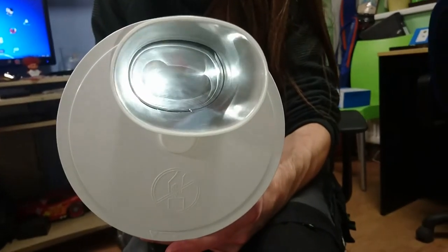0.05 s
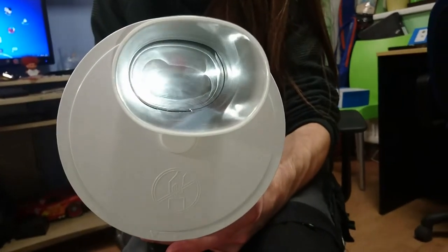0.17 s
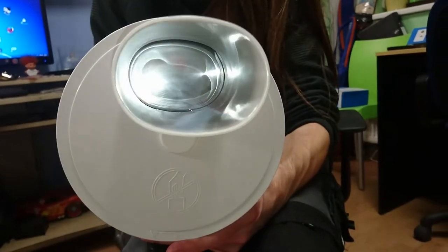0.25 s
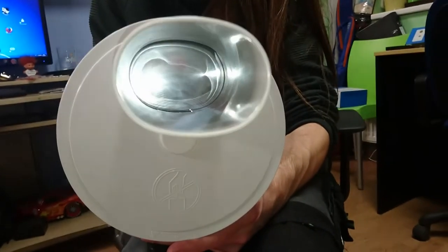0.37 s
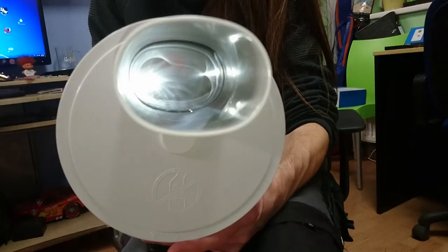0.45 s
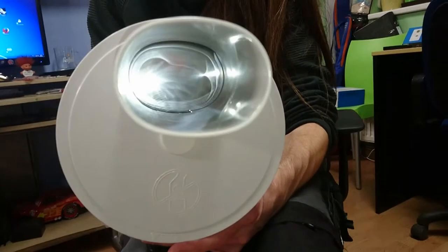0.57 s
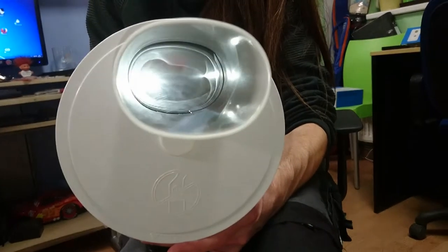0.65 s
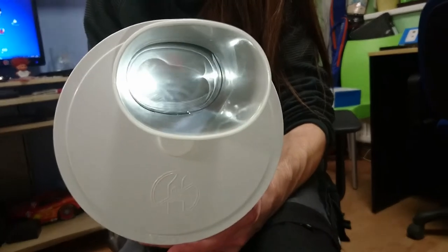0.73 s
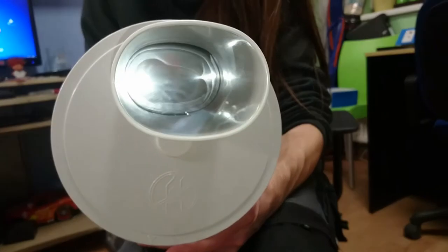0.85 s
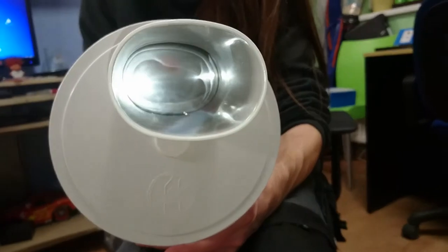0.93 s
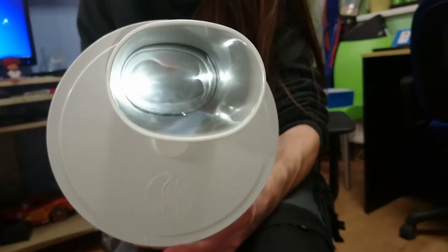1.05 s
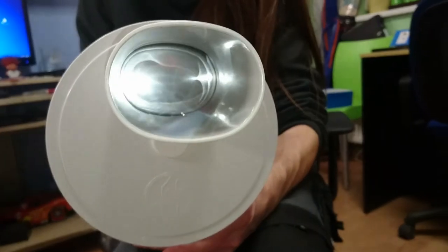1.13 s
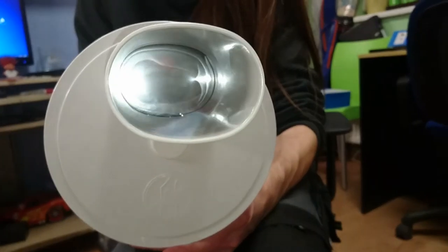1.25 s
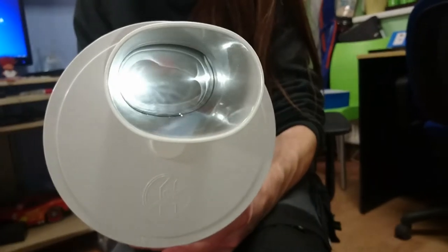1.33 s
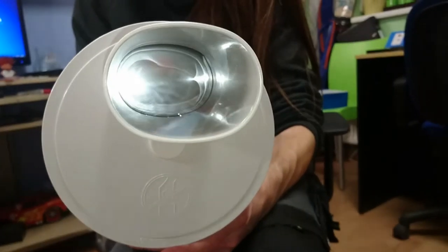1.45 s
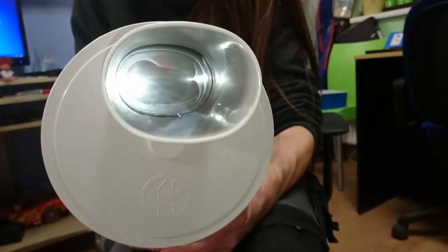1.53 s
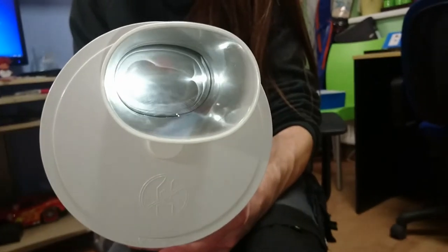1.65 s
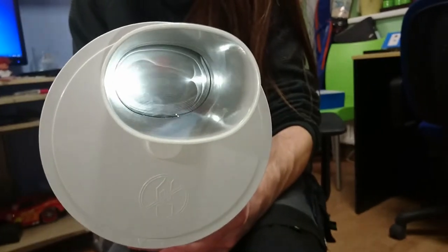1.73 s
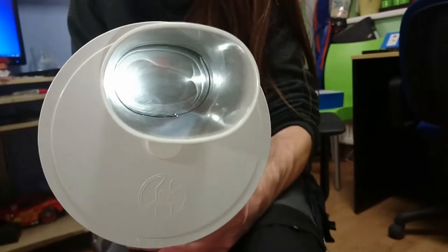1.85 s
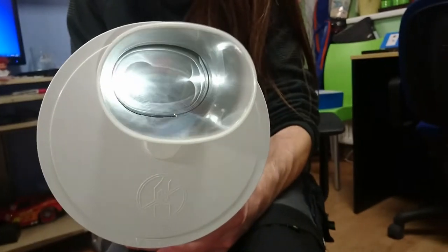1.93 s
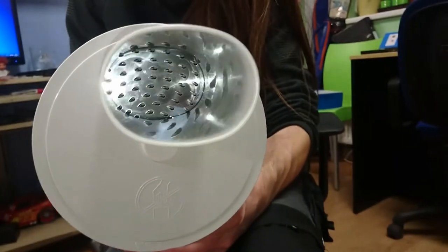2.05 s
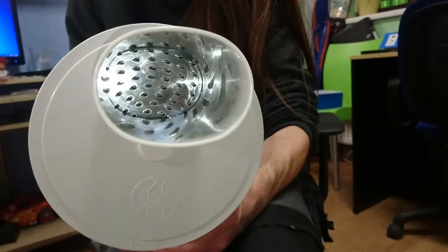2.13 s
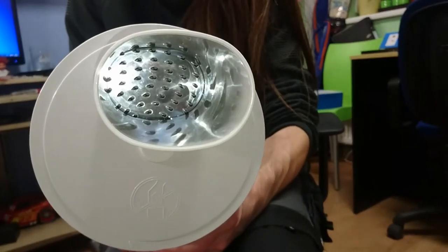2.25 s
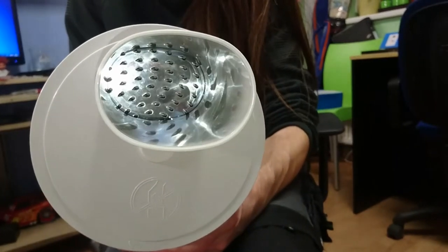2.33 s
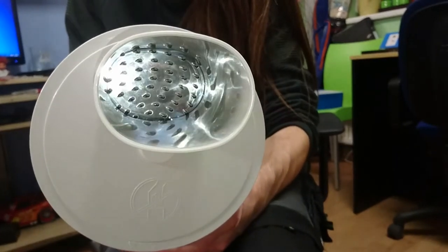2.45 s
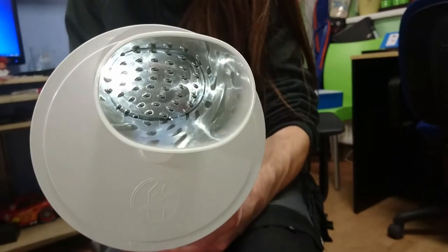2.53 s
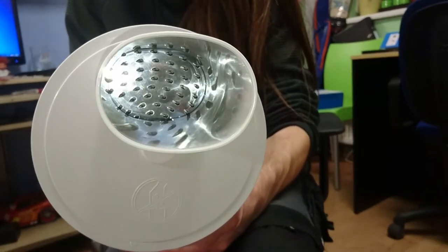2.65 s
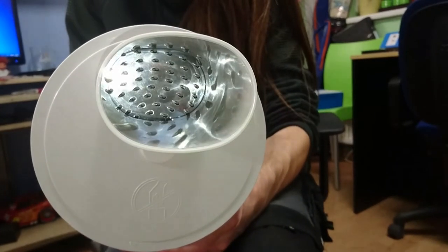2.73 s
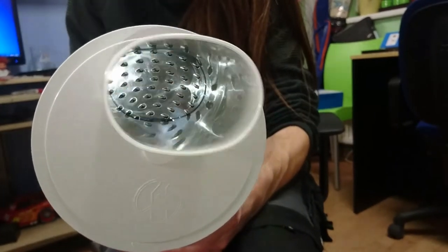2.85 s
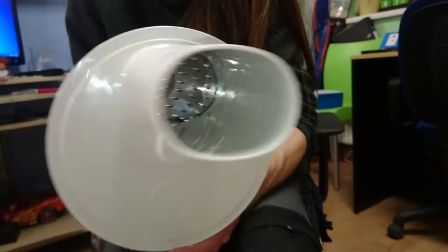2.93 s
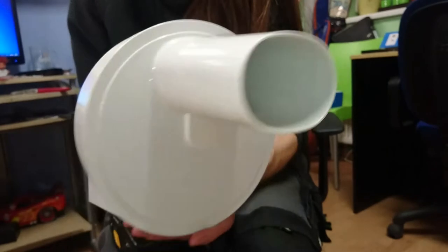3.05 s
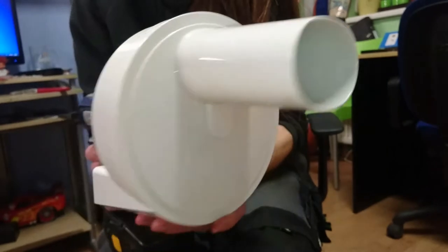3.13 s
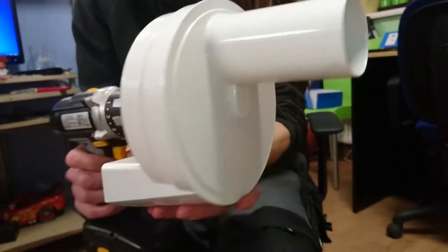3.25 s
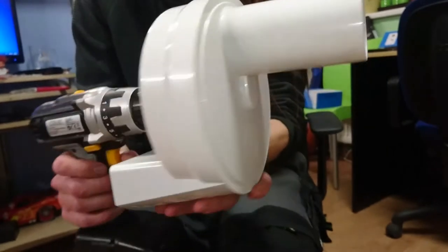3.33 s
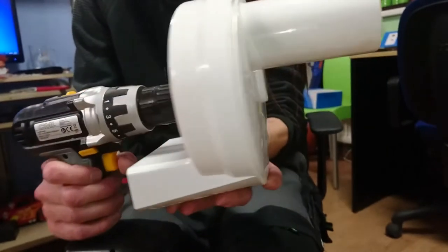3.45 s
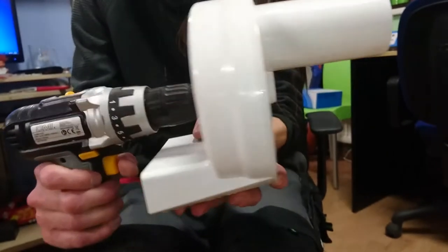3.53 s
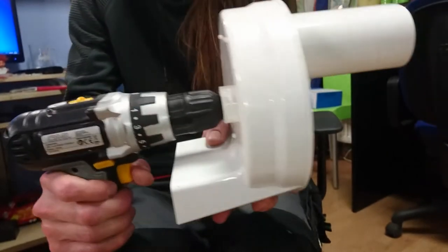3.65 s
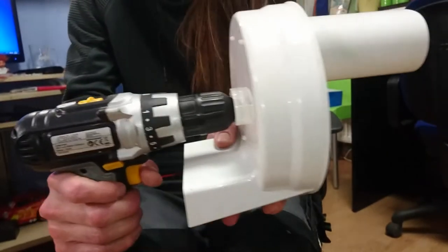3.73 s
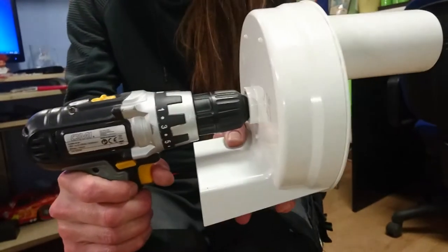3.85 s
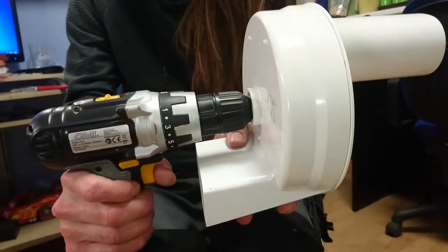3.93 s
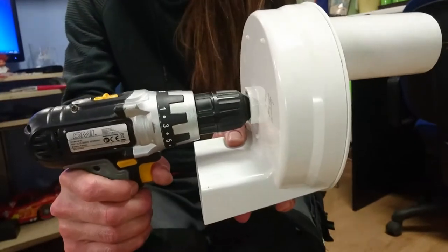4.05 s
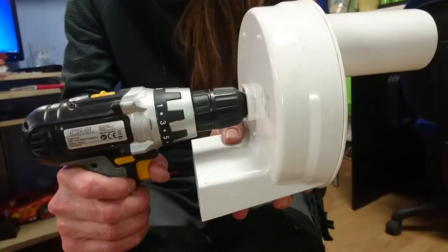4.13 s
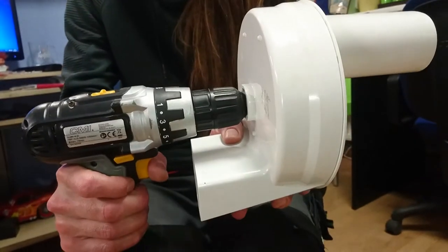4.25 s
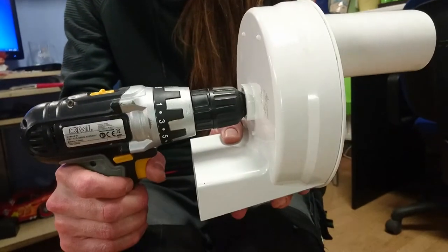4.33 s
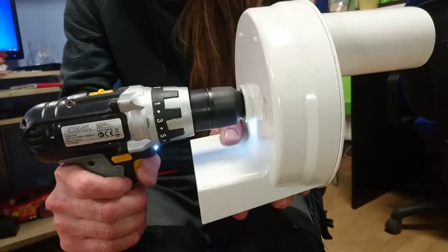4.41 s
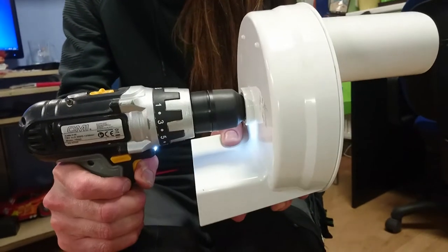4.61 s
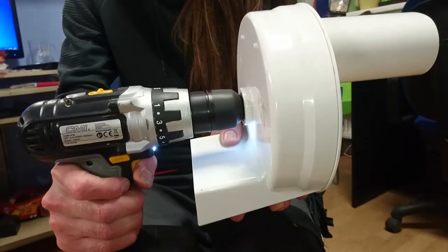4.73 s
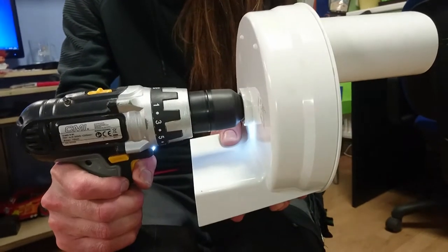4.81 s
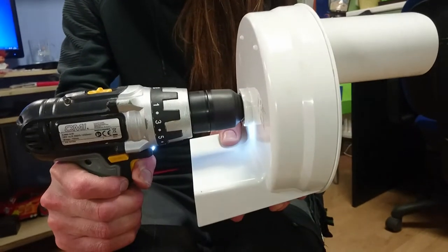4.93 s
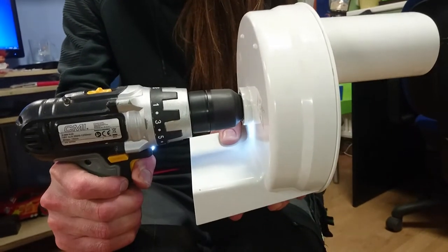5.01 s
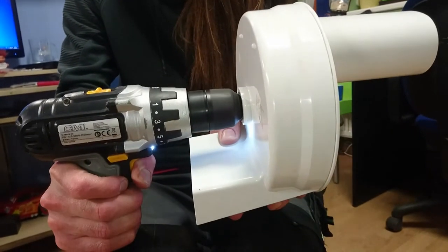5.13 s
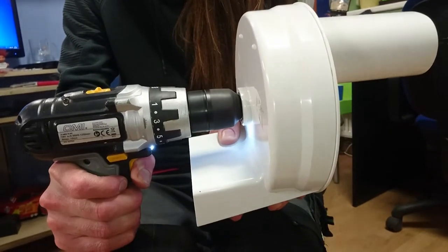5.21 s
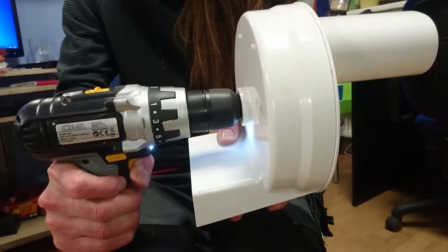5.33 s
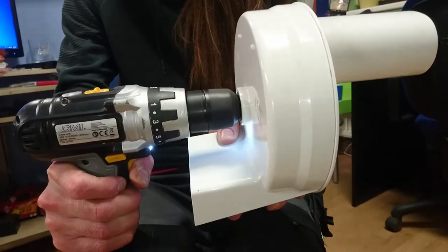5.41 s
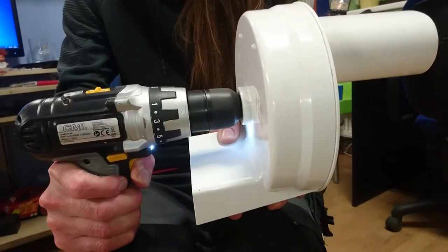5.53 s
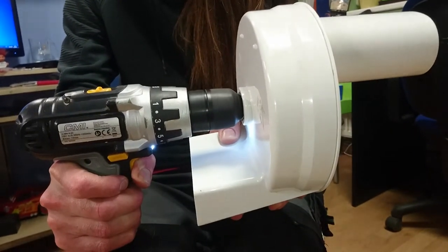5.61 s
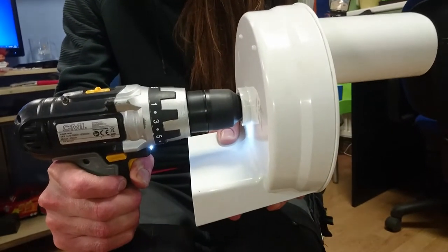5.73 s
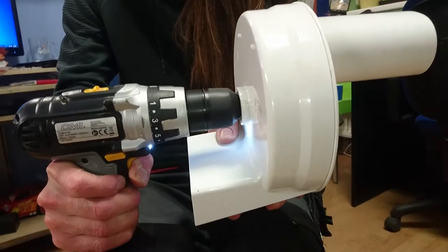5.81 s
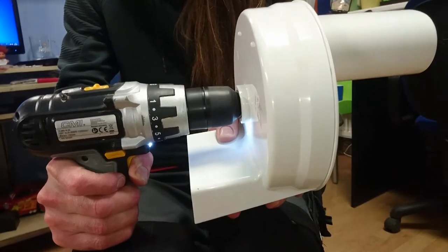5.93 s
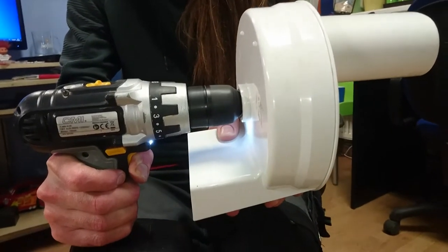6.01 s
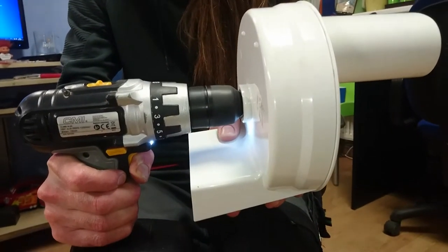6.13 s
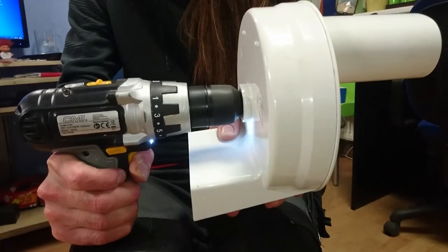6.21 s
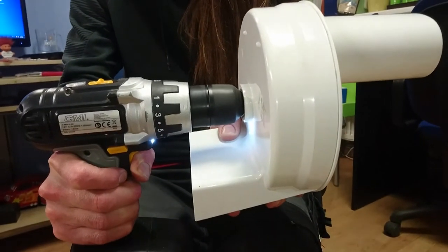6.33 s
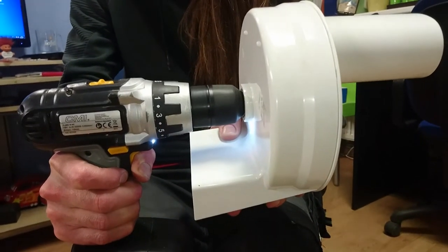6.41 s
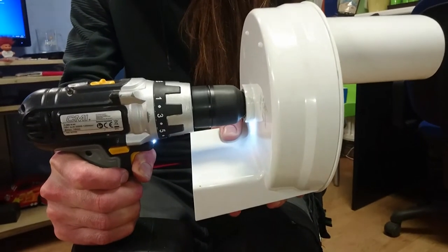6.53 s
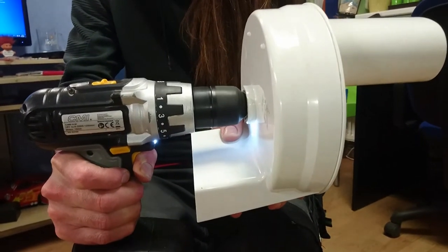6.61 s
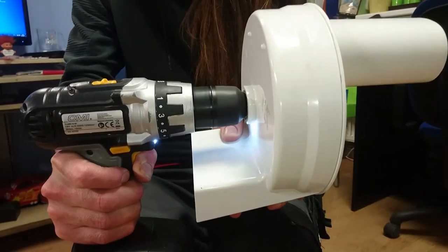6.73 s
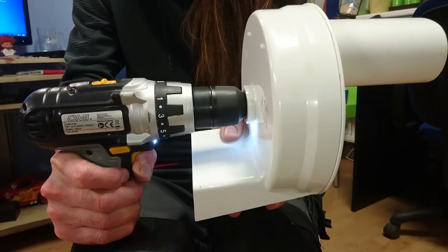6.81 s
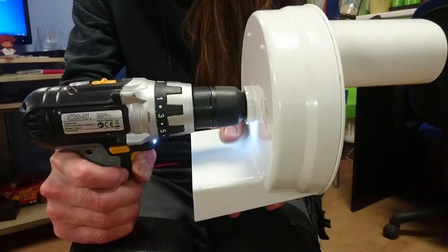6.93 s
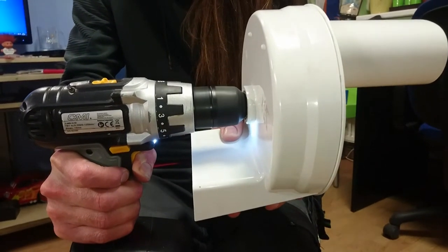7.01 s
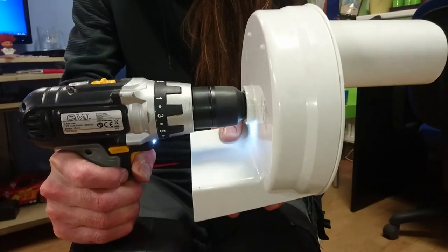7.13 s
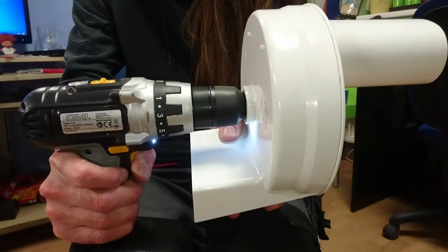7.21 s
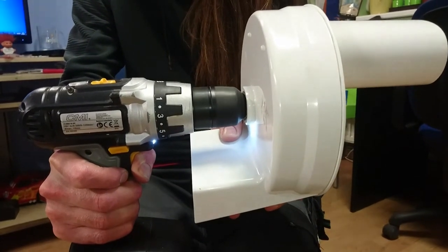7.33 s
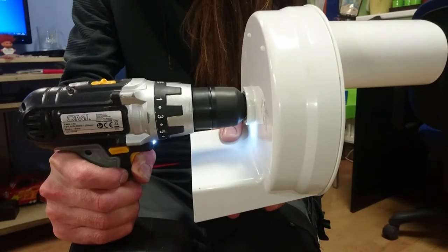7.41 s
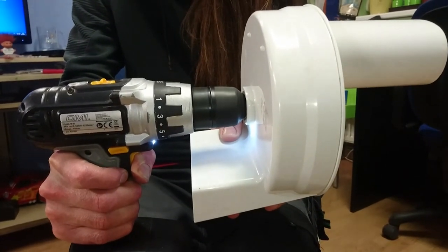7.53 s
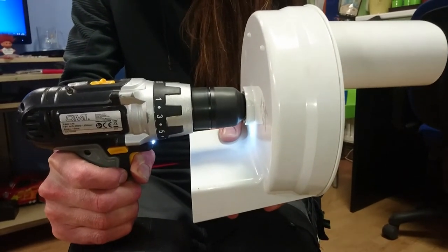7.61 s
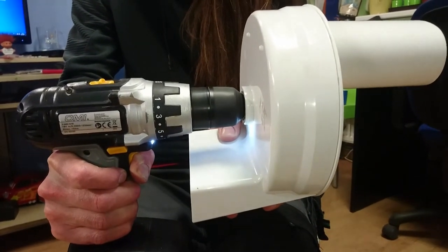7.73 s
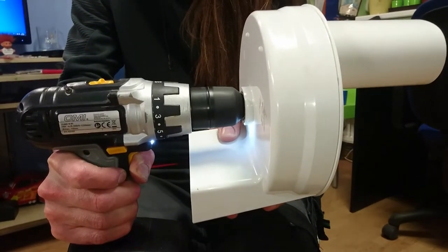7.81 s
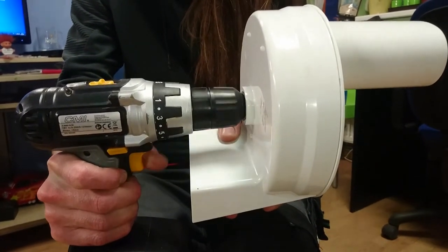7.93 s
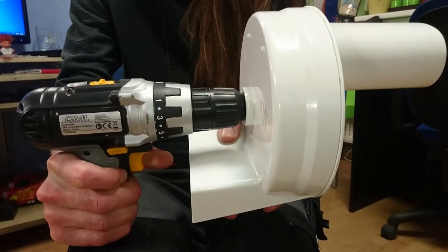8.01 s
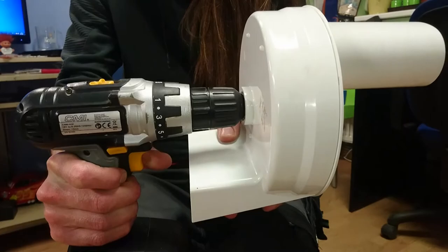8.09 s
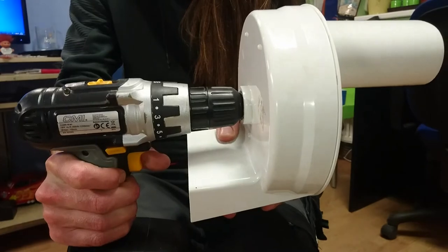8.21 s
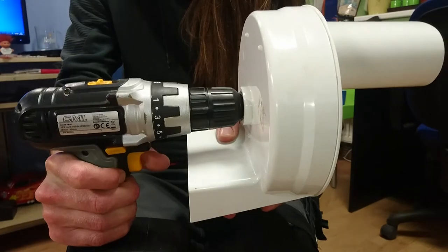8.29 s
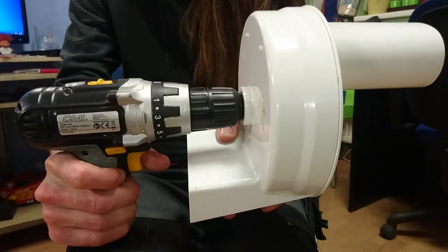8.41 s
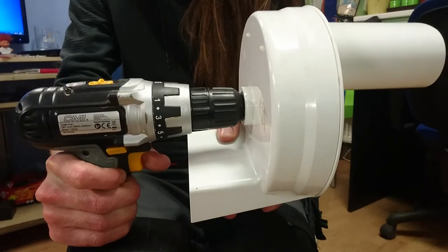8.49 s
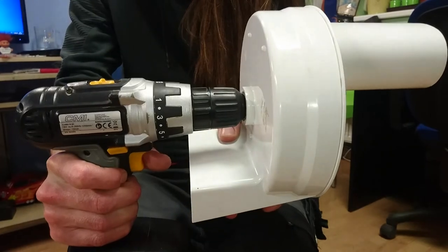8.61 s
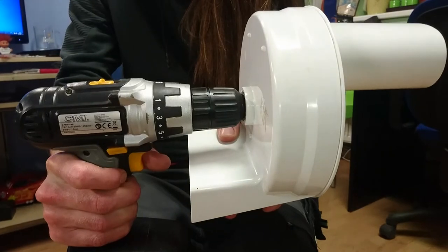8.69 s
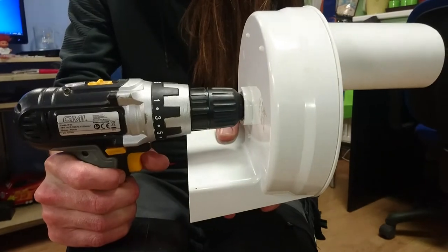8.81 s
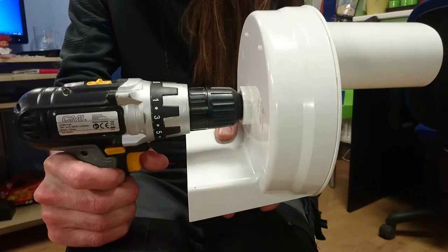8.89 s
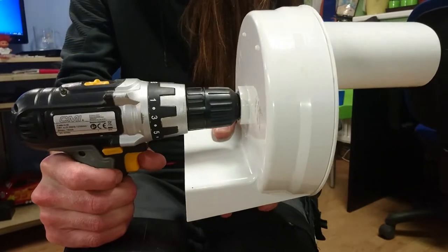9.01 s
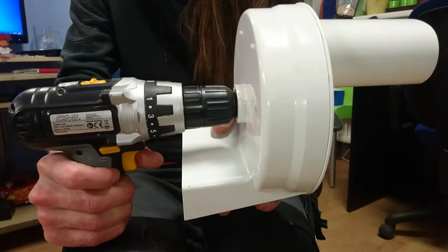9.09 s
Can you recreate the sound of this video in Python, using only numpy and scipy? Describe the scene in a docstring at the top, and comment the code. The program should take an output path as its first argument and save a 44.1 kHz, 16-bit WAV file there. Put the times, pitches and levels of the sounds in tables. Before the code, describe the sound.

Loud rhythmic rattle and metallic scraping from a drill-driven drum grater, stopping abruptly, then restarting with increasingly squawking, juddering turns indoors.

```python
"""A loud, rhythmic rattle and rasp in two runs: a cordless drill spins the steel drum of a plastic grater.
At 17 turns a second the drum scrapes its housing once a turn; in the second run it judders more and more.
Between the runs come a few soft knocks as the grater is turned round; a sleeve rustles then, at the
second start and at the end. Shaped noise makes the rattle, rasp and cloth; sine tones make the squeaks,
squawks and gear whine. A small room and a low drone surround it all."""
import sys
import numpy as np
from scipy import signal
from scipy.fft import rfft, irfft, next_fast_len
from scipy.io import wavfile
from scipy.ndimage import map_coordinates

SR = 44100
rng = np.random.default_rng(int(sys.argv[2]) if len(sys.argv) > 2 else 0)


def put_to_file(sound):
    """Save the sound as 16-bit audio at rate SR, in the file named by the first command-line argument."""
    columns = np.atleast_2d(sound).T  # one column per channel
    safe = np.clip(columns, -1, 1)
    whole_steps = np.round(safe * 32767)
    wavfile.write(sys.argv[1], SR, whole_steps.astype(np.int16))


N = 403515
TIME = np.arange(N) / SR

# How far the drum has turned in each run; it scrapes hardest at whole turns.
# Each row: time in seconds, turns so far.
TURNS_FRONT = [(-.012, 0), (.63, 11), (1.215, 21), (2.037, 35), (2.3, 37)]
TURNS_SIDE = [(4.45, -.9), (4.525, 0), (4.764, 4), (5.1135, 10), (6.289, 30), (7.465, 50), (7.936, 58),
              (8.05, 59.8), (8.2, 61.5)]
# When the drill runs: trigger pulled in seconds, released in seconds. The first pull is before the start.
RUN_FRONT = (-0.53, 2.041)
RUN_SIDE = (4.459, 7.941)
FULL_SPEED = 17.01  # turns a second
SPIN_UP_S, SPIN_UP_DB = 0.061, 7.5  # the drill starts this much quieter and comes up to speed
# The brake bites, then the drum coasts out.
BRAKE_DB_PER_S, COAST_DB, COAST_DB_PER_S = 287.5, -16.5, 100

# High spots where the drum bumps the housing in every turn.
# Each row: place as a share of the turn, width in turns, boost in dB.
BUMPS_FRONT = [(1, 0.14, 5), (.34, 0.07, 5.5), (.73, 0.04, 2.5)]
BUMPS_SIDE = [(.04, 0.12, 9.1), (.28, 0.11, 4.4), (.72, .15, 2.5)]
# The edge catches just before the whole turn and lets go: lead in turns, fade in turns, boost in dB.
CATCH_LEAD, CATCH_FADE, CATCH_DB = 0.023, 0.12, 6.5
# A lighter second rub: place in the turn, width in turns, boost in dB.
RUB_AT, RUB_WIDTH, RUB_DB = 0.25, 0.12, 2.5

# Tone colour of the plastic housing, heard into the chute and from the side.
# Each row: frequency in Hz, relative level in dB per Hz.
HOUSING_FRONT = [(40, -42.5), (80, -26.5), (180, -24), (300, -13.5), (420, -3), (540, -8.5), (660, -1.5),
                 (830, -11.5), (1000, -5), (1260, -1.5), (1480, -6.5), (1650, -22.5), (2400, -42)]
HOUSING_SIDE = [(45, -59.5), (95, -20.5), (160, -27.5), (260, -18), (320, -21), (375, -5), (425, -1.5),
                (470, -3.5), (560, -3.5), (675, -4), (760, -7.5), (860, -10.5), (1020, -3), (1300, -7.5),
                (1490, -3), (1620, -32), (2400, -32)]
# Tone colour of the scraping steel. Each row: frequency in Hz, relative level in dB per Hz.
STEEL_FRONT = [(900, -52), (1800, -3.5), (2500, -3), (3200, -1.5), (4500, -3), (5700, 0), (6800, -5),
               (8000, -13), (9000, -12.5), (10400, -6), (12000, -10), (14300, -9), (16000, -20.5)]
STEEL_SIDE = [(900, -51.5), (1800, -2.5), (2800, -1), (3600, -4), (4600, 0.5), (5300, 2), (6800, 1),
              (7900, -11.5), (9000, -11.5), (10000, -11), (12800, -14), (16000, -20.5)]
# Tone colour of the drum's edge catching. Each row: frequency in Hz, relative level in dB per Hz.
SNAP = [(700, -24), (1500, -3), (3000, 0.5), (5000, 5), (6800, -1.5), (8200, -10), (11000, -7.5),
        (16000, -11.5)]
# The edge catches hard in the first run. Each row: time in seconds, relative level in dB.
CATCHES_FRONT = [(.165, -15.5), (.396, -15), (.456, -19.5), (.572, -16.5), (.746, -15.5), (.864, -16),
                 (.981, -15), (1.04, -13.5), (1.098, -17), (1.215, -17.5), (1.274, -23), (1.332, -15.5),
                 (1.449, -16), (1.508, -13), (1.625, -16), (1.86, -14.5), (1.977, -15), (2.038, -14)]

# The drum sticks and squawks in the second run. Each row: time in seconds, relative level in dB.
SQUAWKS = [(4.508, -26.5), (4.57, -15.5), (4.628, -12.5), (4.689, -20.5), (4.746, -16.5), (4.912, -24),
           (5.446, -21), (5.505, -15), (5.619, -21.5), (5.68, -18.5), (5.798, -19.5), (5.974, -16.5),
           (6.032, -17), (6.092, -16.5), (6.15, -16.5), (6.208, -13.5), (6.445, -13), (6.563, -12.5),
           (6.621, -15.5), (6.678, -10), (6.737, -11), (6.8, -15.5), (6.913, -9), (6.972, -9), (7.032, -9),
           (7.09, -10.5), (7.209, -10.5), (7.269, -13), (7.326, -9), (7.438, -13.5), (7.562, -8.5),
           (7.623, -9.5), (7.74, -9), (7.799, -11.5), (7.867, -16), (7.921, -10.5)]
# The slips inside one squawk; the last two are near the octave.
# Each row: seconds from its peak, half-length in seconds, pitch in Hz before detuning, relative level in dB.
SLIPS = [(-.0112, 0.0043, 650, -5), (-.004, 0.0033, 640, -2.5), (.0024, .004, 652, 1),
         (-.008, 0.0046, 1290, -7.5), (.0058, .003, 1250, 2)]
# Tone colour of steel slipping on plastic. Each row: frequency in Hz, relative level in dB per Hz.
GRIT = [(4000, -26), (8500, -1), (16000, -3)]
# Tight spots where the drum squeaks on the wall in every turn. Each row: place as a share of the turn,
# width in turns, relative level at the end of the run in dB, growth through the run in dB.
SQUEAKS_FRONT = [(.94, .08, -16, -6), (0.12, 0.036, -23, 5), (.34, .06, -16.5, 10), (.51, 0.037, -23, 10)]
SQUEAKS_SIDE = [(.06, 0.038, -18.5, 6), (.23, .06, -24, 6.7), (.34, .03, -24, 2), (.49, 0.062, -22, 16)]
SQUEAK_RISE_HZ_PER_S = 4000  # within one squeak

# Ring of the steel drum. Each row: frequency in Hz, relative level in dB, time to fall 60 dB in seconds.
DRUM = [(4048, 3, .3), (4807, -12.5, .95), (5631, -11.5, 1.0), (6525, -21, .6)]
# Ring of the hollow housing. Each row: frequency in Hz, relative level in dB, time to fall 60 dB in seconds.
HOLLOW = [(438, -5.5, .35), (663.5, 1.5, 0.33), (1230, -14, .25)]
# Motor and gear tones. Each row: frequency at full speed in Hz, relative level in dB.
WHINE = [(442.3, -31.5), (493.3, -37), (527.3, -43), (680.4, -33.5), (1905, -46), (2007.5, -42),
         (2841, -45), (4178, -43), (5243, -36)]
# Tone colour of the motor under starting load. Each row: frequency in Hz, relative level in dB per Hz.
BRUSHES = [(3500, -17), (6000, 3.5), (7300, -4), (9500, -22)]

# Hands knock the housing. Each row: time in seconds, relative level in dB, softness cut-off in Hz.
KNOCKS = [(2.943, -41, 800), (3.085, -48, 400), (3.233, -35, 430), (3.486, -49, 700)]
# A sleeve slides as the grater is turned, as the hand tightens on the trigger and at the end.
# Each row: time of the peak in seconds, swell in seconds, fade in seconds, level in dB.
SLIDES = [(3.3, 0.21, 0.2, -61), (4.46, 0.029, 0.022, -48), (8.87, 0.32, 0.11, -54.5),
          (9.1, 0.075, 0.13, -44)]
# Tone colour of the sleeve. Each row: frequency in Hz, relative level in dB per Hz.
CLOTH = [(250, -12), (600, -0.5), (1400, -0.5), (2300, -2.5), (4300, -1.5), (6000, 11.5), (6900, 6.5),
         (8000, -8), (11000, -4.5), (16000, -27.5)]
# The grip shifts, heard as a dull bump. Each row: time in seconds, level in dB.
THUMPS = [(2.18, -34)]

# How long the room echoes. Each row: frequency in Hz, time to fall 60 dB in seconds.
ROOM = [(200, 0.3), (1000, 0.35), (5000, 0.33), (14000, 0.17)]
# Tone colour of the background drone. Each row: frequency in Hz, relative level in dB per Hz.
ROOM_TONE = [(25, -26.5), (42, -12.5), (52, -6.5), (190, -3.5), (250, -0.5), (320, -18), (450, -18.5),
             (800, -26.5), (1700, -34), (2500, -32), (3600, -22.5), (6700, -27), (12000, -40.5),
             (16000, -35)]
# Stereo width. Each row: frequency in Hz, side minus mid in dB.
WIDTH = [(100, -12), (400, -15), (700, -10), (1200, -3), (2200, -3), (5000, -1)]
# Stereo balance at full lean. Each row: frequency in Hz, left minus right in dB.
LEAN = [(500, 0), (1300, 0.5), (3000, 1), (5000, 1.5), (6500, -4.5), (7200, -1), (8200, 10), (10000, 12),
        (12000, 15), (16000, 18)]
TOP_HZ = 16100  # nothing sounds above this


def amp(db):
    """Decibels to gain."""
    return 10 ** (np.asarray(db) / 20)


def unit(x):
    """Scale to rms 1."""
    return x / np.sqrt(np.mean(x ** 2) + 1e-20)


def along(points, hz):
    """Read a table of (Hz, value) points on a log frequency axis."""
    f, v = np.transpose(points)
    return np.interp(np.log(hz + 1), np.log(f), v)


def wobble(rate):
    """A smooth random curve with `rate` random points a second."""
    points = rng.standard_normal(int(N * rate / SR) + 4)
    return map_coordinates(points, [TIME * rate])


def noise():
    """Two independent tracks of white noise."""
    return rng.standard_normal((2, N))


def filtered(x, response):
    """Multiply the spectrum of x by a response that depends on frequency."""
    m = next_fast_len(N + SR // 4)
    return irfft(rfft(x, m) * response(np.fft.rfftfreq(m, 1 / SR)), m)[..., :N]


def radiate(pair, spectrum, lean=1):
    """Colour two noises and spread them in stereo: bass alike, top treble mostly left; the mid has rms 1."""
    def mid_and_side(hz):
        width = along(WIDTH, hz)
        return amp(along(spectrum, hz)) * amp(np.outer([0, 1], width)) / np.hypot(1, amp(width))

    def left_and_right(hz):
        tilt = lean * along(LEAN, hz)
        return amp(np.outer([1, 0], tilt)) / np.hypot(1, amp(tilt))

    mid, side = filtered(pair, mid_and_side)
    ports = filtered(np.array([mid + side, mid - side]), left_and_right)
    return ports / np.std(ports.mean(0))


def from_left(x, lead_ms):
    """The sound reaches the left microphone first."""
    return filtered(x, lambda hz: np.exp(1j * np.pi * np.outer([1, -1], hz) * lead_ms / 10 ** 3))


def swelling(t, swell, fade):
    """A smooth rise to 1 at t = 0 and a smooth fall."""
    return np.exp(-(t / np.where(t < 0, swell, fade)) ** 2)


def from_spot(turns, at):
    """Distance in turns from a place on the drum, from -0.5 to 0.5."""
    return (turns - at + .5) % 1 - .5


def high_spot(turns, at, width):
    """A smooth bump, 0 to 1, that passes once a turn."""
    return np.exp(-(from_spot(turns, at) / width) ** 2)


def slack_left(run):
    """Falls from 1 to 0 through the run."""
    return np.interp(TIME, run, [1, 0])


def drive(run):
    """Gain of the drill: it spins up when the trigger is pulled, brakes and coasts when it is let go."""
    on, off = run
    running, stopped = np.maximum(TIME - on, 0), np.maximum(TIME - off, 0)
    spin_up = amp(-SPIN_UP_DB / (1 + (running / SPIN_UP_S) ** 20))
    spin_up = spin_up * np.minimum(running / .004, 1)  # soft start, no click
    braking = amp(-BRAKE_DB_PER_S * stopped)
    coasting = amp(COAST_DB - COAST_DB_PER_S * stopped)
    return spin_up * np.maximum(braking, coasting)


def drum(turns, run, bumps, housing, steel, rattle_db, scrape_db, snap_db, uneven_db,
         rattle_growth_db, scrape_growth_db):
    """The off-centre drum presses and lets go each turn: plastic rattles, steel rasps, the edge snaps."""
    bump_db = sum(db * high_spot(turns, at, width) for at, width, db in bumps)
    catch_db = CATCH_DB * np.exp(-((turns + CATCH_LEAD) % 1) / CATCH_FADE)
    catch_db = catch_db + RUB_DB * high_spot(turns, RUB_AT, RUB_WIDTH)
    force = 1 + 0.098 * wobble(17)  # no two turns press equally hard
    shake = unit(amp(force * bump_db + uneven_db * wobble(130)))
    rub = unit(amp(force * catch_db + uneven_db * wobble(130)))
    rattle = radiate(shake * friction(turns, repeat=0.96, repeat_hz=830, grit_db=2.0), housing)
    scrape = radiate(rub * friction(turns, repeat=0.2, repeat_hz=2600, grit_db=1.3), steel)
    since_catch = (turns + 0.004) % 1 / FULL_SPEED
    snap = radiate(amp(-60 * since_catch / 0.015 + wobble(29)) * noise(), SNAP)
    slack = slack_left(run) ** 2  # a positive growth makes the run start quieter
    rasp = amp(scrape_db) * scrape + amp(snap_db) * snap * drive(run)
    rasp = amp(-scrape_growth_db * slack) * rasp
    return drive(run) * (amp(rattle_db - rattle_growth_db * slack) * rattle + rasp)


def friction(turns, repeat, repeat_hz, grit_db):
    """The same bumps pass every turn, so coarse rubbing repeats; the fine part is new, gritty contact."""
    size = round(SR / FULL_SPEED)
    steps = 8 * size  # fine steps round the drum
    bumps = irfft(np.exp(2j * np.pi * rng.random((2, size // 2))), steps)
    track = unit(bumps[:, (turns % 1 * steps).astype(int) % steps])

    def share(hz):
        return np.clip(repeat, 0, 1) / np.hypot(1, hz / repeat_hz)

    fresh = filtered(noise(), lambda hz: np.sqrt(1 - share(hz)))
    repeated = filtered(track, lambda hz: np.sqrt(share(hz)))
    return (repeated + fresh) * unit(amp(grit_db * wobble(900)))


def catches(rows, steel, housing, attack, t60, knock_db, level_db):
    """The edge bites hard: a burst of rasping steel and a knock in the plastic."""
    # attack and t60: seconds to rise and to fall by 60 dB
    bite = sum(amp(db - 60 * np.abs(TIME - s) / np.where(TIME < s, attack, t60)) for s, db in rows)
    rasp = radiate(noise(), steel)
    knock = radiate(noise(), housing)
    return amp(level_db) * bite * (rasp + amp(knock_db) * knock)


def judders(scatter, grit_db, shake_swell, shake_s, shake_db, level_db):
    """Stick and slip: each squawk is a few quick slips, low and near the octave; it shakes the housing."""
    out = np.zeros((3, N + SR))  # tone, slipping, shaking
    t = np.arange(-SR // 25, SR // 25) / SR
    draws = rng.standard_normal((len(SQUAWKS), 2 + len(SLIPS)))
    for (s, db), (detune, start, *luck) in zip(SQUAWKS, draws):
        slips, tone = [], 0
        for (at, length, hz, level), chance in zip(SLIPS, luck):
            slip = amp(level + chance) * swelling(t - at, length, length)
            slips.append(slip)
            pitch = hz * (1 + scatter * detune)
            tone = tone + slip * np.sin(2 * np.pi * pitch * (t - at) + 2 * start)
        parts = np.array([tone, slips[-2] + slips[-1], swelling(t, shake_swell, shake_s)])
        out[:, round(s * SR):][:, :len(t)] += amp(db + level_db) * parts
    tone, slipping, shaking = out[:, len(t) // 2:][:, :N]  # puts each peak at its listed time
    rattle = amp(shake_db) * shaking * radiate(noise(), HOUSING_SIDE)
    grit = amp(grit_db) * slipping * radiate(noise(), GRIT)
    return tone * amp([[.4], [-.4]]) + rattle + grit


def squeaks(turns, run, spots, start_hz, end_hz, rough):
    """The same tight spots squeak every turn: short, rough tones that rise as the drum pulls free."""
    hz = np.interp(TIME, run, [start_hz, end_hz])
    out = 0
    for at, width, db, growth_db in spots:
        t = from_spot(turns, at) / FULL_SPEED
        phase = 2 * np.pi * (hz * t + SQUEAK_RISE_HZ_PER_S * t ** 2 / 2) + rough * wobble(220)
        level = amp(db - growth_db * slack_left(run) + 1.8 * wobble(17))
        out = out + level * high_spot(turns, at, width) * np.sin(phase)
    return drive(run) * out * amp([[.4], [-.4]])  # slightly louder on the left


def ringing(x, modes, level_db):
    """Steel or plastic sings on faintly after it is scraped: x sets off a set of dying tones."""
    t = np.arange(SR) / SR
    ring = sum(amp(db - 60 * t / t60) * np.cos(2 * np.pi * hz * t) for hz, db, t60 in modes)
    return amp(level_db) * signal.fftconvolve(x, ring[None] / np.linalg.norm(ring), axes=1)[:, :N]


def ring_out():
    """The last catch of the first run leaves the steel drum ringing."""
    t = np.maximum(TIME - RUN_FRONT[1], 0)
    return sum(amp(-33 + db - 60 * t / t60) * np.sin(2 * np.pi * hz * t) for hz, db, t60 in DRUM)


def gears(turns, run, level_db, growth_db):
    """Tones locked to the shaft waver with the play in the gears; their level shifts through the run."""
    clock = turns / FULL_SPEED + 3.2e-5 * wobble(25)
    tones = 0
    for hz, db in WHINE:
        start = rng.normal(0, min(hz / 3000, 2), (2, 1))  # higher tones differ more between the sides
        tones = tones + amp(db + 2.6 * wobble(13)) * np.sin(2 * np.pi * hz * clock + start)
    return amp(level_db - growth_db * slack_left(run) ** 2) * drive(run) * tones


def inrush(peak_s, swell, fade, level_db):
    """The motor hisses while it takes up the load after the trigger is pulled."""
    strain = swelling(TIME - peak_s, swell, fade) * (TIME > RUN_SIDE[0])
    return amp(level_db) * strain * radiate(noise(), BRUSHES)


def knocks(t60, level_db):
    """Fingers knock the hollow plastic: a sudden start and a short, dull ring."""
    out = 0
    for s, db, soft_hz in KNOCKS:
        def dull(hz):
            return amp(along(HOUSING_SIDE, hz)) / (1 + (hz / soft_hz) ** 4)

        plastic = unit(filtered(rng.standard_normal(N), dull))
        decay = amp(level_db + db - 60 * np.abs(TIME - s) / t60)
        out = out + plastic * np.clip((TIME - s) / .002, 0, 1) * decay
    return out


def sleeve():
    """A sleeve slides: uneven cloth noise swells and fades."""
    cloth = radiate(noise() * amp(1.3 * wobble(90)), CLOTH)
    return cloth * sum(amp(db) * swelling(TIME - s, swell, fade) for s, swell, fade, db in SLIDES)


def thumps(bump_hz, length):
    """A few slow swings of the held machine."""
    out = 0
    for s, db in THUMPS:
        t = TIME - s
        out = out + amp(db) * swelling(t, length, length) * np.sin(2 * np.pi * bump_hz * t)
    return out


def room(x):
    """A furnished room: echoes are fading noise, and the top treble dies first."""
    hz, t, z = signal.stft(rng.standard_normal((2, SR // 2)), SR, nperseg=256)
    # the bass reaches both microphones alike
    z = z[0] + np.array([z[1], -z[1]]) * amp(along(WIDTH, hz))[:, None]
    fade = amp(-60 * t / along(ROOM, hz)[:, None])
    tail = signal.istft(z * fade, SR, nperseg=256)[1]
    tail = np.pad(tail / np.linalg.norm(tail[0]), ((0, 0), (SR // 200, 0)))  # begins 5 ms late
    return signal.fftconvolve(x, tail, axes=1)[:, :N]


def room_tone(level_db, hum_hz, hum_db):
    """A steady low drone with faint hiss, its bass a little to the right, and a thin hum."""
    drone = amp(level_db) * radiate(noise(), ROOM_TONE, lean=0.413) * amp([[-.8], [.8]])
    hum = amp(hum_db + 2 * wobble(4)) * np.sin(2 * np.pi * hum_hz * TIME + wobble(2.4))
    return drone + hum


def scene():
    """First run with the chute facing the microphones, second run side-on."""
    front, side = [np.interp(TIME, *np.transpose(rows)) for rows in (TURNS_FRONT, TURNS_SIDE)]
    first = drum(front, RUN_FRONT, BUMPS_FRONT, HOUSING_FRONT, STEEL_FRONT, rattle_db=-20.5,
                 scrape_db=-18.5, snap_db=-31.5, uneven_db=1.58, rattle_growth_db=0.5, scrape_growth_db=-2.0)
    first = first + catches(CATCHES_FRONT, STEEL_FRONT, HOUSING_FRONT, attack=0.049, t60=0.047,
                            knock_db=-6.5, level_db=1.5)
    first = first + squeaks(front, RUN_FRONT, SQUEAKS_FRONT, start_hz=1375, end_hz=1160, rough=.5)
    steel_ring = ringing(first, DRUM, level_db=-36) + ring_out()
    plastic_ring = ringing(first, HOLLOW, level_db=-35.5)
    first = first + steel_ring + plastic_ring + gears(front, RUN_FRONT, level_db=-4, growth_db=-3.0)

    second = drum(side, RUN_SIDE, BUMPS_SIDE, HOUSING_SIDE, STEEL_SIDE, rattle_db=-23.5,
                  scrape_db=-20.0, snap_db=-30.5, uneven_db=1.32, rattle_growth_db=5.5, scrape_growth_db=4.0)
    second = second + squeaks(side, RUN_SIDE, SQUEAKS_SIDE, start_hz=1200, end_hz=1200, rough=1.8)
    squawks = judders(scatter=0.016, grit_db=-14.5, shake_swell=0.017, shake_s=0.024,
                      shake_db=-13, level_db=-.5)
    second = second + squawks + ringing(squawks, HOLLOW, level_db=-32.5)

    motor = gears(side, RUN_SIDE, level_db=1.5, growth_db=2)
    motor = motor + inrush(peak_s=4.615, swell=0.14, fade=0.086, level_db=-22.5)
    near = from_left(first, lead_ms=0.18) + from_left(second, lead_ms=0.074)
    near = near + from_left(motor, lead_ms=0.047)
    near = near + knocks(t60=.08, level_db=-4) + sleeve() + thumps(bump_hz=100, length=0.023)
    return near + amp(-8.0) * room(near) + room_tone(level_db=-47.5, hum_hz=587, hum_db=-72.0)


def record(dry):
    """The highest peaks are rounded off; nothing is kept above the band limit."""
    rounded = dry / (1 + (dry / .9) ** 6) ** (1 / 6)
    return filtered(rounded, lambda hz: hz < TOP_HZ)


dry = scene()
out = record(dry)
put_to_file(out)
```